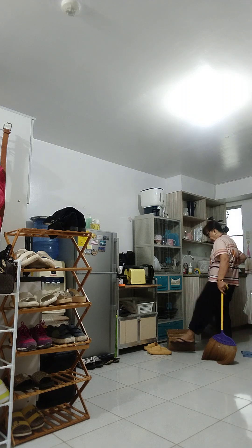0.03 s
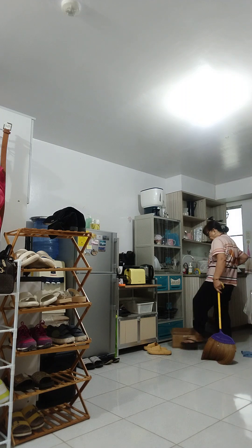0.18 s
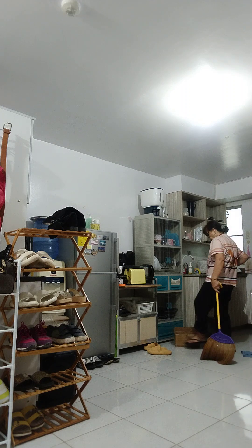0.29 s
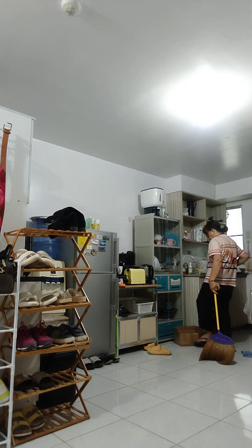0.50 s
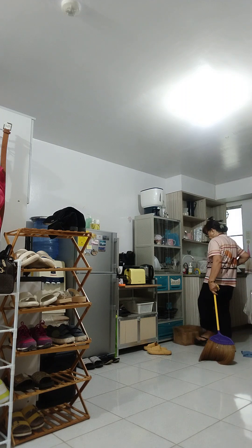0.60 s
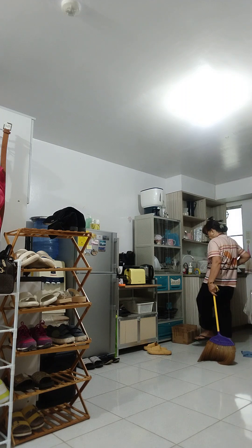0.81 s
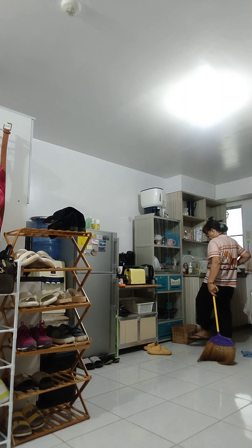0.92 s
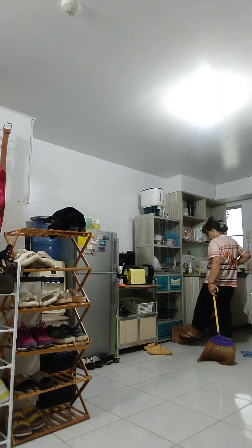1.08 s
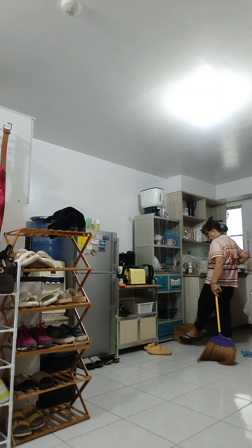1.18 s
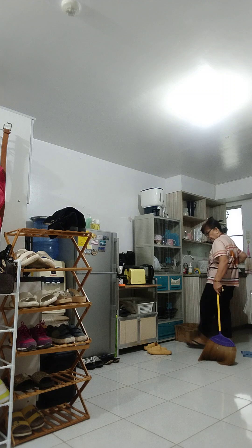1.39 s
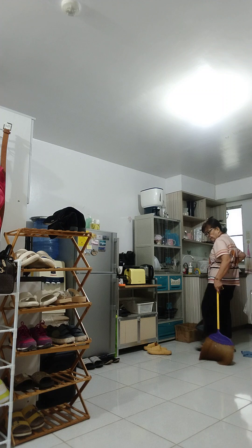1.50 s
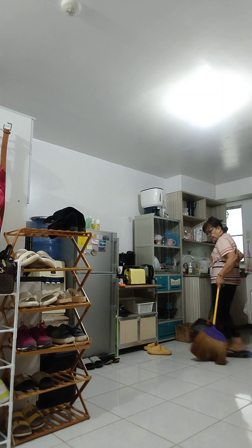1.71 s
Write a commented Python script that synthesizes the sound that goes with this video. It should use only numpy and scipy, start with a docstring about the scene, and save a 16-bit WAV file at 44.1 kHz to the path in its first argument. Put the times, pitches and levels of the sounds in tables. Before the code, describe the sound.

A dustpan is nudged over kitchen tiles: after a faint sole slap at 0.13 seconds, a light hollow knock cluster at 0.22 leads into gritty bristle hiss. A louder clatter at 0.65 starts another scrape, with small slipper slaps near 0.85 and 1.02. After a brief lull, a strong rub with slaps and heel thuds bursts at 1.25, fading by 1.6. Soft fridge hum and room rumble continue throughout.

```python
"""A small tiled kitchen, heard from across the room: a faint sole slap, then a dustpan is nudged twice
and knocks hollowly (struck modes). Bristles and grit hiss over the tiles after each push (shaped noise
and ticks) and single grains ping (short tone bursts). Slipper soles slap (noise bursts) and heels thud
(struck slab modes) with the pushes and later; one last strong rub dies away.
A fridge (wavering sines) and the house (shaped noise) rumble softly underneath throughout."""
import sys
import numpy as np
from scipy import signal
from scipy.fft import rfft, irfft, next_fast_len
from scipy.io import wavfile
from scipy.ndimage import uniform_filter1d, map_coordinates

SR = 44100
rng = np.random.default_rng(int(sys.argv[2]) if len(sys.argv) > 2 else 0)


def store_wav(level_fs):
    """Save 16-bit WAV to argv[1]."""
    pcm = np.round(np.clip(np.atleast_2d(level_fs), -1, 1) * 32767)
    wavfile.write(sys.argv[1], SR, pcm.T.astype(np.int16))


def elevation(decibels):
    """Turn decibel levels (scalar or array-like) into linear amplitude ratios."""
    levels = np.asarray(decibels, float)
    return 10 ** (levels / 20)


N = 79380
T = np.arange(N) / SR

# dustpan contacts with the floor: start_s, strength_db, favoured_pitch_hz (of that spot of the pan)
PAN_KNOCKS = [(.2167, -25.5, 370), (.2222, -22.5, 350), (.2335, -29, 400), (.2395, -21.5, 430),
              (.2495, -31.5, 380), (.260, -36.5, 444), (.6507, -18.5, 600), (.6565, -16, 414),
              (.6625, -15.5, 477), (.6748, -20.5, 480), (.694, -25, 490), (.707, -26.5, 486),
              (.725, -33.5, 477), (0.752, -38, 480), (.80, -39.5, 470)]
# ringing modes of the hollow pan: pitch_hz, level_db, t60_s
PAN_MODES = [(304, -4, 0.047), (346, -11.5, 0.074), (411, -3, 0.066), (445.7, -3, .09), (535, -6.5, 0.067),
             (617.5, -14.5, 0.097), (783, -7, 0.047), (1225, -5, 0.04), (1480, -4, 0.042), (2650, -10, .04)]
# pressure of the drag over the tiles: time_s, pressure_db, coarse_share_db (scrape against hiss)
DRAG_PRESSURE = [(0, -66, 0), (0.214, -65, 3), (0.229, -38, -10), (.255, -39.5, 0.5), (.32, -33, -8),
                 (.345, -37, -4), (.43, -37, -7.5), (.51, -37, -6.5), (0.581, -43, -6), (.645, -52.5, 0),
                 (.66, -34.5, -3.5), (.73, -39.5, -2.5), (.82, -42.5, -6), (.87, -42, -2.5),
                 (0.884, -40, -21), (.93, -39.5, -7.5), (.995, -47, -11), (1.02, -41.5, -9),
                 (1.08, -46.5, -7), (1.12, -59.5, -8), (1.17, -82, -12), (1.234, -80, -16),
                 (1.241, -38, -15), (1.27, -27, -5), (1.331, -37.5, -4.5), (1.37, -35, -9),
                 (1.419, -38, -6), (1.47, -43, -8), (1.50, -41, -4), (1.57, -44, -5), (1.605, -55, -11.5),
                 (1.68, -86, -16), (1.8, -71, -16)]
# spectrum of the bristle hiss: freq_hz, density_db (per Hz, relative)
BRISTLE_HISS = [(300, -43), (1000, -22.5), (1700, -20), (2400, -4), (3300, -6), (4200, -7.5), (5500, -1.5),
                (7000, -5), (8800, -4), (10500, -9.5), (14000, -39)]
# resonances of the scraped pan edge: pitch_hz, width_hz, level_db
EDGE_RESONANCES = [(600, 600, -14.5), (1500, 430, -5.5), (2247, 500, -2), (2870, 320, 1.5), (3540, 406, 0)]
# single grains of grit flicked by the bristles: centre_s, peak_db, pitch_hz
FLICKED_GRAINS = [(.505, -31, 2850), (0.878, -28, 5800), (0.89, -38, 5600), (1.028, -30, 2190),
                  (1.038, -27.5, 3020), (1.246, -34, 2190), (1.270, -20, 2140), (1.34, -21, 5500),
                  (1.352, -32, 5000), (1.483, -31.5, 2540), (1.515, -35, 2400)]
# flat slaps of soles and pan lip: start_s, strength_db, rise_s, t60_s, favoured_pitch_hz
SOLE_SLAPS = [(.127, -40, 0.0095, 0.15, 2200), (0.65, -30.5, 0.0023, 0.09, 1300),
              (0.854, -37, 0.0032, 0.098, 1500), (1.008, -35, .003, .1, 2310),
              (1.02, -28, 0.0087, 0.14, 2060), (1.044, -30, .01, 0.15, 1300),
              (1.261, -21.5, 0.0042, 0.19, 1900), (1.279, -24, 0.0018, 0.16, 1750)]
# resonances of the sole: pitch_hz, width_hz, level_db
SOLE_RESONANCES = [(793, 340, 4), (1300, 560, 3.5), (1900, 406, 3), (2400, 167, 3.5), (3070, 750, -1),
                   (4860, 1170, -6.5), (7640, 3300, -14.5)]
# heels on the floor: start_s, strength_db, favoured_pitch_hz
HEEL_THUDS = [(.228, -34, 105), (0.662, -33, 98), (1.245, -32.5, 105), (1.284, -25, 248), (1.302, -21, 300),
              (1.335, -28.5, 306), (1.36, -30.5, 106), (1.498, -44, 106), (1.545, -48.5, 246),
              (1.636, -45.5, 237)]
# modes of the floor slab: pitch_hz, level_db, t60_s
SLAB_MODES = [(59.3, -33, 0.16), (96, -15, 0.4), (111.2, 2.5, 0.13), (198, -2, 0.095), (244, -3, 0.076),
              (336, -0.5, 0.07), (472, 6, 0.028)]
# decay of the kitchen's tail: freq_hz, t60_s
KITCHEN_DECAY = [(100, .5), (500, 0.67), (2000, 0.55), (9000, 0.5)]
# spectrum of the house air: freq_hz, density_db (per Hz, relative)
HOUSE_SPECTRUM = [(20, -41), (45, -8.5), (110, -6), (240, 0.5), (400, -7.5), (600, -11.5), (900, -16.5),
                  (1500, -21.5), (3000, -25.5), (3900, -28.5), (6000, -35.5), (9000, -32), (10500, -37),
                  (14000, -64)]
# fridge hum lines: pitch_hz, level_db
FRIDGE_HUM = [(57, -58.5), (114, -57.5), (230, -53.5), (345, -53), (415, -59.5), (535, -59)]
# treble response of the microphone: freq_hz, gain_db
MIC_TREBLE = [(8800, 0), (9500, -5.5), (10600, -15)]

FOCUS = 1.46  # how narrowly a contact favours its pitch
SPREAD_DB, CRACKLE_DB, HUM_WAVER_DB, FLUTTER_DB = 1.5, 2.5, 2, 0.6  # depths of random variation
PATCHY_DB = 1.3  # unevenness of the rubbing noise
GRIT_PER_S, GRIT_DB, GRIT_SPREAD_DB = 2500, -7.5, 4.5  # GRIT_DB is against the rubbing noise
GRAIN_CYCLES = 13.2  # between the points 35 dB below the peak
HOUSE_DB = -43.5
PAN_ROOM_DB, FEET_ROOM_DB, DRAG_ROOM_DB = -9, -6.5, -10.5  # tail against each direct sound
LOW_CUT_HZ = 27.8  # corner of each of the three low cuts


def unit(x):
    """Scaled to rms 1."""
    return x / np.sqrt(np.mean(x ** 2) + 1e-20)


def along(points, hz):
    """Reads a (Hz, value) curve on a log frequency axis."""
    f, v = np.transpose(points)
    return np.interp(np.log(hz + 1), np.log(f + 1), v)


def wobble(rate):
    """A smooth random curve, rate knots a second; zero once its N // 100 knots run out."""
    return map_coordinates(rng.standard_normal(N // 100), [T * rate])


def filtered(x, response):
    """x times a complex response of frequency."""
    m = next_fast_len(len(x) + 8192)
    return irfft(rfft(x, m) * response(np.fft.rfftfreq(m, 1 / SR)), m)[:len(x)]


def resonant(x, peaks):
    """x through parallel causal resonances (Hz, width Hz, dB) of alternating sign."""
    def response(f):
        total = 0
        for k, (centre, width, db) in enumerate(peaks):
            band = 1j * f * width / (centre * centre - f * f + 1j * f * width)
            total = total + (-1) ** k * elevation(db) * band
        return total
    return filtered(x, response)


def patchy(depth_db):
    """White noise whose gain varies in random patches of time and frequency."""
    z = signal.stft(rng.standard_normal(N), nperseg=512)[2]
    field = uniform_filter1d(rng.standard_normal(z.shape), size=5, axis=0)
    field = uniform_filter1d(field, size=8, axis=1)
    return unit(signal.istft(z * elevation(depth_db * unit(field)), nperseg=512)[1][:N])


def blow(start_s, strength_db, modes, focus_hz, rise_s):
    """Decaying modes struck together; those far from the favoured pitch stay weak."""
    t = np.clip(T - start_s, 0, None)
    ring = 0
    for hz, level_db, t60 in modes:
        db = strength_db + level_db + SPREAD_DB * rng.standard_normal()
        weakening = np.hypot(1, FOCUS * (hz / focus_hz - focus_hz / hz))
        ring = ring + elevation(db - 60 * t / t60) * np.sin(2 * np.pi * hz * t) / weakening
    return -(1 - np.exp(-t / rise_s)) * ring


def dustpan():
    """Every contact rings the modes of the same hollow pan."""
    return sum(blow(s, db, PAN_MODES, hz, rise_s=0.001) for s, db, hz in PAN_KNOCKS)


def rubbing():
    """Patchy friction noise peppered with grit ticks of random strength and sign."""
    draws = rng.random((2, N))
    ticks = draws[0] < GRIT_PER_S / SR
    strength = elevation(-GRIT_SPREAD_DB * np.log(1 - .98 * draws[1]))
    grit = ticks * strength * np.sign(rng.standard_normal(N))
    return patchy(PATCHY_DB) + elevation(GRIT_DB) * unit(grit)


def drag():
    """One pressure drives a fine bristle hiss and a coarser scrape through the pan edge's resonances."""
    s, pressure_db, coarse_db = np.transpose(DRAG_PRESSURE)
    fine = unit(filtered(rubbing(), lambda f: elevation(along(BRISTLE_HISS, f))))
    scrape = resonant(rubbing(), EDGE_RESONANCES)
    coarse = unit(resonant(scrape, [(2650, 8700, 0)]))  # one broad hump over the whole scrape
    level = elevation(np.interp(T, s, pressure_db) + FLUTTER_DB * wobble(39.2))
    return level * (fine + elevation(np.interp(T, s, coarse_db)) * coarse)


def grains():
    """Each flicked grain is a few soft-edged cycles."""
    pings = 0
    for s, db, hz in FLICKED_GRAINS:
        t = T - s
        edge = np.exp(-(t * hz * 4 / GRAIN_CYCLES) ** 2)
        pings = pings + elevation(db) * edge * np.sin(2 * np.pi * hz * t)
    return pings


def slaps():
    """Each slap is crackly noise through the sole's resonances, rising fast and dying away."""
    bursts = 0
    for s, db, rise, t60, hz in SOLE_SLAPS:
        t = np.clip(T - s, 0, None)
        crackle = rng.standard_normal(N) * elevation(CRACKLE_DB * wobble(600))
        slap = unit(resonant(resonant(crackle, SOLE_RESONANCES), [(hz, 1.57 * hz, 0)]))
        bursts = bursts + elevation(db - 60 * t / t60) * (1 - np.exp(-t / rise)) * slap
    return bursts


def heels():
    """Each heel rings the low modes of the floor slab."""
    return sum(blow(s, db, SLAB_MODES, hz, rise_s=0.0015) for s, db, hz in HEEL_THUDS)


def kitchen(x):
    """The room's tail: noise in which each frequency dies at its own speed."""
    hz, t, z = signal.stft(rng.standard_normal(SR // 2), SR, nperseg=256)
    decay = elevation(-60 * t / along(KITCHEN_DECAY, hz)[:, None])
    tail = signal.istft(z * decay, SR, nperseg=256)[1]
    late = np.pad(x, (200, 0))  # the tail starts 200 samples after the direct sound
    return signal.fftconvolve(late, tail / np.linalg.norm(tail))[:N]


def fridge():
    """A few hum lines that waver in level and phase."""
    hum = 0
    for hz, db in FRIDGE_HUM:
        level = elevation(db + HUM_WAVER_DB * wobble(12.75))
        hum = hum + level * np.sin(2 * np.pi * hz * T + 1.33 * wobble(12))
    return hum


def house():
    """Steady rumble and hiss: slightly patchy noise given the spectrum of the house."""
    air = filtered(patchy(depth_db=1), lambda f: elevation(along(HOUSE_SPECTRUM, f)))
    return elevation(HOUSE_DB) * unit(air)


def scene():
    """All sources, with the room's tail on the pan, the feet and the rubbing."""
    pan = dustpan()
    rub = drag() + grains()
    feet = slaps() + heels()
    wet = elevation(PAN_ROOM_DB) * kitchen(pan)
    wet = wet + elevation(DRAG_ROOM_DB) * kitchen(rub)
    wet = wet + elevation(FEET_ROOM_DB) * kitchen(feet)
    return (pan + rub + feet + wet + fridge() + house())[None]


def top_cut(x):
    """Nothing passes above the cut-off."""
    return signal.sosfilt(signal.butter(12, 10640, fs=SR, output="sos"), x)


def record(dry):
    """A phone microphone that rolls off at both ends."""
    def microphone(f):
        low_cut = (1j * f / (LOW_CUT_HZ + 1j * f)) ** 3
        return elevation(along(MIC_TREBLE, f)) * low_cut
    mix = filtered(dry[0], microphone)[None]
    return top_cut(mix)


dry = scene()
out = record(dry)
store_wav(out)
```